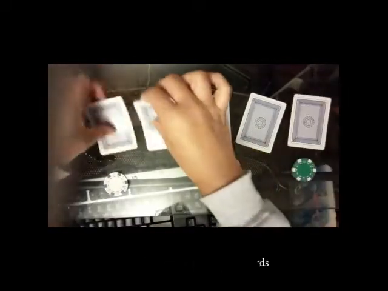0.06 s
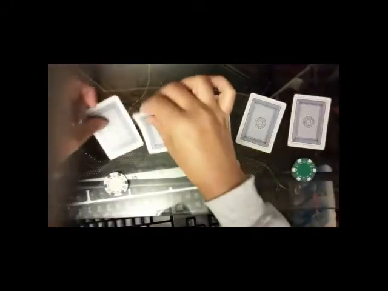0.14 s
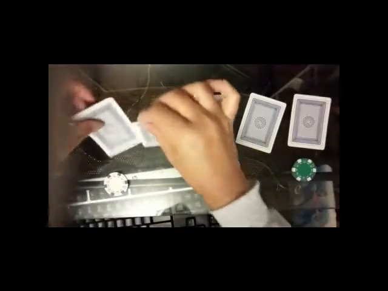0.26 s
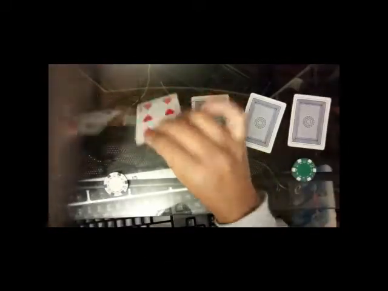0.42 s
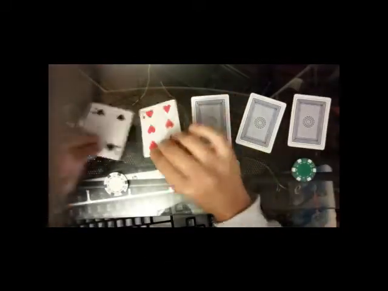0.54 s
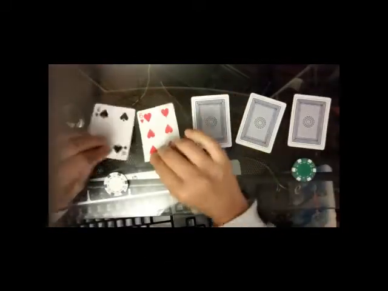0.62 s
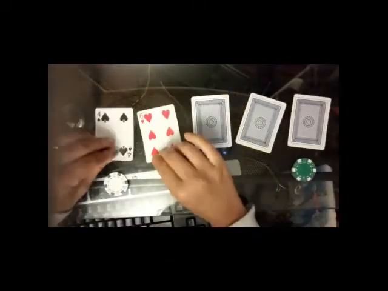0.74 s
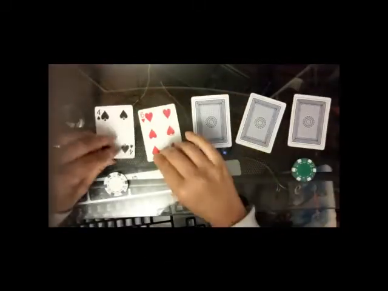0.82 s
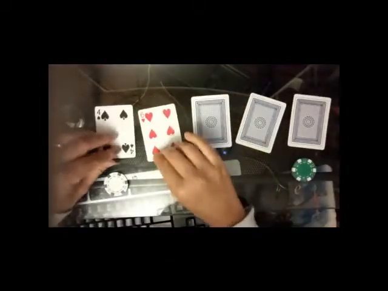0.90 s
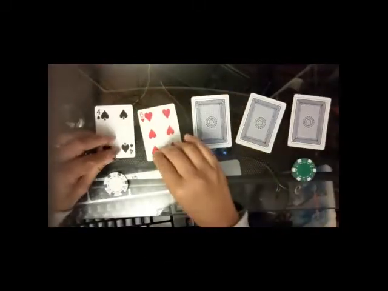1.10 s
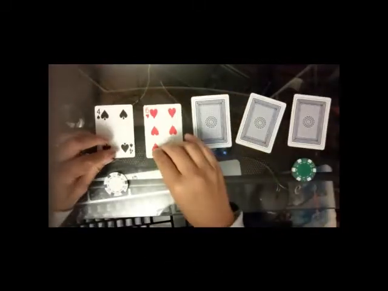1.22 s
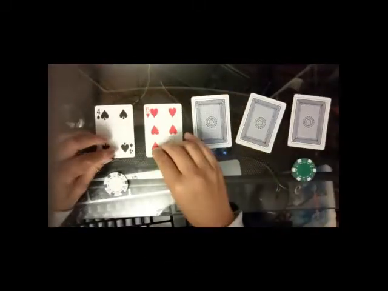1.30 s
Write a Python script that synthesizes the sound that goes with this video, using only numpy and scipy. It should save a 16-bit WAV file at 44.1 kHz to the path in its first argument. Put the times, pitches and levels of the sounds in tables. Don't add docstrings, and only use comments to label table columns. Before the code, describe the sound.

Stiff playing cards flipped with a double crack, hissing slide, light taps and a final slap

```python
import sys
import numpy as np
from scipy import signal
from scipy.fft import rfft, irfft, next_fast_len
from scipy.io import wavfile
from scipy.ndimage import uniform_filter1d

SR = 44100
rng = np.random.default_rng(int(sys.argv[2]) if len(sys.argv) > 2 else 0)


def materialize(psi):
    bounded = np.clip(np.atleast_2d(psi).T, -1, 1)
    quanta = np.round(bounded * 32767).astype(np.int16)
    wavfile.write(sys.argv[1], SR, quanta)


def voltage_ratio(level):
    return 10 ** (np.asarray(level, float) / 20)


N = 59535
TIME_S = np.arange(N) / SR
LEFT_UP = np.array([[1], [-1]])


def unit(x):
    return x / np.sqrt(np.mean(x ** 2))


def low(x, hz):
    return signal.sosfilt(signal.butter(2, hz, fs=SR, output="sos"), x)


def colour(x, points):
    hz, db = np.array(points, float).T
    size = 4096
    f = np.maximum(np.arange(size // 2 + 1) * SR / size, 1)
    cepstrum = irfft(np.log(voltage_ratio(np.interp(np.log(f), np.log(hz), db))))
    fold = np.r_[1, 2 * np.ones(size // 2 - 1), 1, np.zeros(size // 2 - 1)]
    kernel = irfft(np.exp(rfft(cepstrum * fold)))
    kernel = kernel / np.sqrt(np.sum(kernel ** 2))
    return signal.fftconvolve(x, kernel[None], axes=1)[:, :N]


def walk(rate_hz):
    k = int(SR / rate_hz)
    steps = np.repeat(rng.standard_normal(N // k + 1), k)
    return unit(uniform_filter1d(steps, k)[:N])


def follow(curve):
    s, db = np.array(curve).T
    return np.interp(TIME_S, s, db, left=-120, right=-120)


def grit(points, grain_db, gain):
    shared_treble, shared_hz = 0.2875, 1530
    clicks = rng.standard_normal((2, N))
    sizes = voltage_ratio(grain_db * rng.exponential(size=N))
    left, right = unit(clicks * sizes) * gain
    right = shared_treble * left + np.sqrt(1 - shared_treble ** 2) * right
    split = signal.butter(2, shared_hz, fs=SR, output="sos")
    right = right + signal.sosfiltfilt(split, left - right)
    return colour(np.array([left, right]), points)


def bursts(rows, points, grain_db):
    power = sum(voltage_ratio(2 * db) * np.exp(-((TIME_S - s) / (ms / 1000)) ** 2) for s, db, ms in rows)
    return grit(points, grain_db, np.sqrt(power))


def slide(curve, points):
    grain_db, flicker_db, patchy_db, split_hz = 1.5, 1.5, 1.5, 3300
    hiss = grit(points, grain_db, voltage_ratio(follow(curve) + flicker_db * walk(59.977)))
    dull = low(hiss, split_hz)
    return dull * voltage_ratio(patchy_db * walk(110)) + (hiss - dull) * voltage_ratio(patchy_db * walk(140))


# frequency in Hz, level in dB per Hz.
FLOOR = [(25, 0.5), (220, -11.5), (433, -18.5), (706, -19.5), (2040, -28.5), (6000, -34), (11600, -36.5),
         (15800, -36.5)]
# time in seconds, level in dB.
HUM = [(0, -14.5), (.22, 4), (.30, 5.5), (.62, 3), (.70, -3.5), (1.35, 1)]


def floor():
    background = colour(rng.standard_normal((2, N)), FLOOR)
    rumble = low(background, 360)
    shared_rumble = .9 * rumble + .3 * rumble[::-1]
    background = background - rumble + shared_rumble * voltage_ratio(2.0 * walk(12))
    hum_level = voltage_ratio(-70 + follow(HUM) + 2 * walk(16))
    hum_hz = 78 + 2.5 * walk(2.7)
    hum = hum_level * np.sin(2 * np.pi * np.cumsum(hum_hz) / SR)
    whine = voltage_ratio(-90) * np.sin(2 * np.pi * 11300 * TIME_S)
    return background * voltage_ratio(-63.5) + hum + whine


def room(x):
    t = np.arange(SR // 2) / SR
    gap_s, split_hz = 0.0027, 1223
    echo = rng.standard_normal((2, len(t))) * (t > gap_s)
    bass = low(echo, split_hz)

    def fade(noise, t60_s):
        return unit(noise * voltage_ratio(-60 * t / t60_s)) / np.sqrt(len(t))

    tail = voltage_ratio(-18) * fade(bass, 0.31) + voltage_ratio(-10) * fade(echo - bass, 0.23)
    return signal.fftconvolve(x[:1], tail, axes=1)[:, :N]


# frequency in Hz, level in dB.
LEFT = [(150, -0.5), (600, 11), (1200, 3), (2200, 4.5), (5500, 2), (10000, 5), (15000, 2)]


def ports(x):
    lag_s, lag_from_hz, lag_full_hz = 0.00017775, 820, 1900
    size = next_fast_len(N + 512)
    f = np.maximum(np.arange(size // 2 + 1) * SR / size, 1)
    hz, db = np.array(LEFT).T
    half = voltage_ratio(np.interp(np.log(f), np.log(hz), db) / 2)
    lag = lag_s * np.clip(np.log(f / lag_from_hz) / np.log(lag_full_hz / lag_from_hz), 0, 1)
    return irfft(rfft(x, size) * [half, np.exp(-2j * np.pi * f * lag) / half], size)[:, :N]


# start in seconds, level in dB, contact in ms.
THUDS = [(.001, -44.5, 1.93), (0.015, -49.5, 4.63), (0.143, -46, 0.884), (.163, -52.5, 3.75),
         (0.186, -54, 2.93), (0.2234, -43.5, 2.21), (.229, -37.5, 2.9), (0.242, -45, 2.85),
         (0.764, -48.5, 2.38), (.823, -43.5, 2.44), (0.905, -44.5, 2.74), (1.017, -31.5, 2),
         (1.036, -49.5, 2.86), (1.024, -49, 2), (1.044, -41.5, 2.03), (1.052, -41, 2.34),
         (1.0599, -39.5, 2.805), (1.222, -55.5, 2.775)]
# frequency in Hz, level in dB, 60 dB decay in seconds.
TABLE = [(40.04, 2, .25), (62.2, -2, 0.36), (112.42, -1, 0.22), (160.6, -4.5, 0.308), (249.5, -12.5, 0.47),
         (293.75, 4, 0.38), (324, 9, 0.1175), (393.8, 8.5, 0.14)]


def thuds():
    push = sum(-voltage_ratio(db) * np.sin(np.pi * np.clip((TIME_S - s) / (ms / 1000), 0, 1)) for s, db, ms in THUDS)
    skew = 0.72 * LEFT_UP
    ring = sum(voltage_ratio(db - 60 * TIME_S / t60) * np.sin(2 * np.pi * hz * TIME_S + skew * hz / 300)
               for hz, db, t60 in TABLE)
    direct = (push - low(push, 77.0)) * voltage_ratio(0.3 * LEFT_UP)
    return direct + voltage_ratio(-51.5) * signal.fftconvolve(push[None], ring, axes=1)[:, :N]


# time in seconds, level in dB.
SLIDE_LIFT = [(0, -62.5), (.05, -74.5), (.10, -77.5), (.160, -67.5), (.165, -57.5), (.222, -52), (.24, -66),
              (.26, -95)]
# frequency in Hz, level in dB per Hz.
LIFT_COLOUR = [(180, -32), (300, -1.5), (413, -13), (1770, -7.5), (2980, -8), (3410, 1), (11800, -10.5),
               (15400, -7), (16500, -33)]


def lift():
    return slide(SLIDE_LIFT, LIFT_COLOUR)


# time in seconds, level in dB.
SLIDE_FLIP = [(.22, -63), (.25, -44), (.34, -49), (.388, -52), (.395, -54), (.44, -58), (.455, -70),
              (.51, -69), (.53, -92)]
# frequency in Hz, level in dB per Hz.
FLIP_COLOUR = [(180, -43), (300, -24.5), (717, -14), (1210, -6.5), (4690, -6.5), (5640, -8.5), (6560, -13),
               (15200, -15.5), (16500, -42)]


def flip():
    return slide(SLIDE_FLIP, FLIP_COLOUR)


# time in seconds, level in dB.
SLIDE_SKIM = [(.80, -95), (.85, -75), (.90, -61), (.915, -51.5), (.93, -62.5), (.985, -63), (1.005, -55),
              (1.012, -60), (1.02, -84)]
# frequency in Hz, level in dB per Hz.
SKIM_COLOUR = [(400, -15.5), (1200, -9), (2800, -11.5), (4000, -5), (4800, -12.5), (5700, -4.5),
               (6600, -15.5), (15500, -24)]


def skim():
    return slide(SLIDE_SKIM, SKIM_COLOUR)


# time in seconds, level in dB.
SLIDE_SQUARE = [(1.012, -83.5), (1.02, -49), (1.035, -51), (1.05, -48), (1.065, -56), (1.08, -65),
                (1.11, -65), (1.16, -72.5), (1.26, -88.5)]
# frequency in Hz, level in dB per Hz.
SQUARE_COLOUR = [(400, -16.5), (1200, -6.5), (2800, -12.5), (4200, -3), (5700, -11.5), (7000, -14.5),
                 (10000, -18), (15500, -32)]


def square_up():
    return slide(SLIDE_SQUARE, SQUARE_COLOUR)


# centre in seconds, level in dB,
# burst width in ms.
SCUFFS = [(.1425, -51.5, 1.43), (.163, -44, 0.64), (.271, -48.5, 2.9), (.5015, -57, 0.62),
          (.537, -70.5, 0.74), (.547, -52.5, 0.88), (.550, -51.5, 2.29), (.761, -65, 11.5),
          (.825, -63.5, 1.98), (.914, -58.5, 3.16), (1.005, -46, 2.46), (1.0115, -34, 2.11),
          (1.0152, -31.5, 1.93), (1.0575, -35.5, 2.16), (1.061, -44.5, 2.1), (.435, -66.5, 3.8)]
# frequency in Hz, level in dB per Hz.
SCUFF_COLOUR = [(900, -28), (2000, -13.5), (3000, -26.5), (4300, -19), (5900, -15), (7500, -14.5),
                (10000, -16.5), (15500, -18)]


def scuffs():
    return bursts(SCUFFS, SCUFF_COLOUR, 2.5)


# centre in seconds, level in dB, burst width in ms.
KNOCKS = [(.1425, -61, 2.76), (.15, -67, 13.9), (.163, -54.5, 2.6), (.550, -51.5, 0.71), (.638, -66, 0.68),
          (.7215, -53.5, 1.81), (.7655, -42.5, 0.744), (.8242, -36, 0.53), (.8275, -40, 2.6),
          (.834, -43, 2.11), (.86, -58, 29.5), (.970, -52, 1.08), (1.013, -48.5, 2.13)]
# frequency in Hz, level in dB per Hz.
KNOCK_COLOUR = [(88, -41.5), (150, -10), (1170, -5.5), (2250, -9), (2760, -28), (3220, -14.5), (3510, -18),
                (3890, -25.5), (9000, -64.5), (11700, -84.5), (19800, -120)]


def knocks():
    return bursts(KNOCKS, KNOCK_COLOUR, 0.92)


# centre in seconds, level in dB, pitch in Hz, length in cycles.
POPS = [(.1630, -41.5, 691, 0.77), (0.2238, -25, 5300, 2.35), (.2237, -32.5, 874, 1.07),
        (0.2304, -18, 1659, 1.145), (.2425, -28, 3476, 10.2), (0.5477, -50, 4000, 2.83),
        (.549, -42.5, 3283, 2.94), (0.5499, -55, 6037, 3.1), (.552, -55.5, 456.5, 1.5),
        (0.5504, -47.5, 1609, 3.77), (.5520, -46.5, 726.2, 2.21), (.640, -59.5, 717, 2),
        (.722, -49, 3937, 1.98), (0.723, -42.5, 1387, 2.15), (.7655, -50.5, 4040, 3.35),
        (0.7651, -55.5, 5120, 3.3), (.7665, -44.5, 2230, 2.4), (.722, -61.5, 5536, 2.12),
        (.7275, -56.5, 863, 2.04), (0.7684, -41.5, 1069, 2.15), (.8237, -34.5, 395, 0.46),
        (0.824, -32, 982, 1.175), (.8245, -56, 5095, 2.85), (.826, -49, 3550, 2.77),
        (.8251, -28, 2265, 2.3), (0.8265, -32, 1645, 2.4), (0.8287, -32.5, 1232, 1.34),
        (1.012, -33, 1900, 1.8), (1.015, -39.5, 1367, 1.83), (1.0175, -38.5, 895, 1.076),
        (1.0114, -33.5, 4070, 4.1), (1.0118, -29, 9460, 6.6), (0.2294, -21.5, 5610, 2.02),
        (0.224, -21.5, 7520, 5.4), (.258, -27.5, 3600, 10), (1.0135, -38, 2170, 4.07),
        (1.015, -29.5, 6120, 5.2), (1.0578, -38.5, 5786, 10.04)]


def pops():
    pop = sum(voltage_ratio(db) * np.exp(-((TIME_S - s) * hz / cycles) ** 2) * np.cos(2 * np.pi * hz * (TIME_S - s))
              for s, db, hz, cycles in POPS)
    return pop * np.ones((2, 1))


# centre in seconds, level in dB, burst width in ms.
SNAPS = [
    (.2233, -15.5, 0.297),
    (.2255, -31.5, 2.17),
    (.2300, -21.5, 0.56),
    (.2310, -16, 0.525),
    (.2335, -20.5, 0.985),
    (.2425, -21.5, 1.276),
    (.247, -31.5, 6.55),
]
# frequency in Hz, level in dB per Hz.
SNAP_COLOUR = [(120, -25.5), (550, -13), (1000, -19), (1650, -9), (2600, -11.5), (3700, -8), (5500, -16.5),
               (15500, -20)]


def snaps():
    return bursts(SNAPS, SNAP_COLOUR, 2.05)


def scene():
    cracks = snaps()
    cards = scuffs() + knocks() + lift() + flip() + square_up() + skim()
    slaps = pops()
    background = floor() * voltage_ratio(1.01 * LEFT_UP)
    close = ports(cracks + slaps + cards)
    echoes = room(cracks + voltage_ratio(-1.0) * cards + voltage_ratio(-3.0) * slaps)
    return close + echoes + thuds() + background


def top_cut(x):
    return signal.sosfilt(signal.butter(12, 16980, fs=SR, output="sos"), x)


# frequency in Hz, width in Hz, level in dB.
MIC = [(2895, 493, 1.5), (5634, 170, 6), (9014, 900, 4), (8770, 745, -8.5)]


def record(dry):
    x = dry
    for hz, width_hz, db in MIC:
        peak = signal.lfilter(*signal.iirpeak(hz, hz / width_hz, SR), x)
        x = x + (voltage_ratio(db) - 1) * peak
    top_hz = 15900
    x = signal.sosfilt(signal.ellip(10, .3, 45, top_hz, fs=SR, output="sos"), x)
    return top_cut(x)


dry = scene()
out = record(dry)
materialize(out)
```